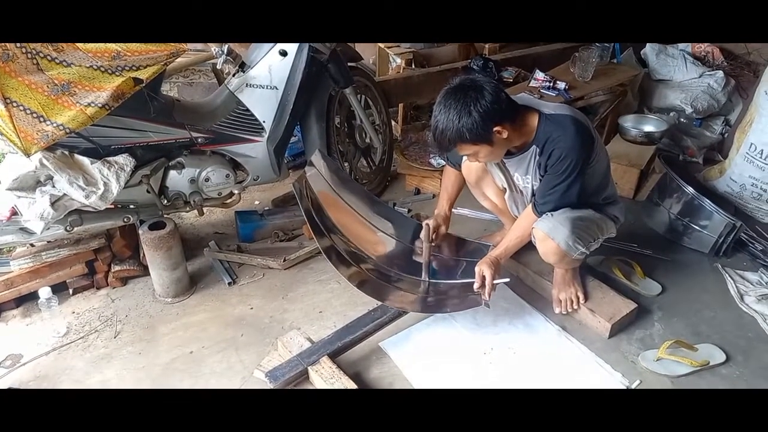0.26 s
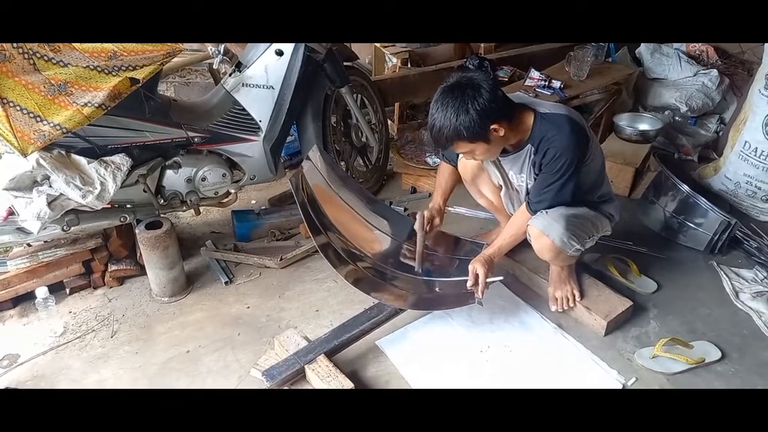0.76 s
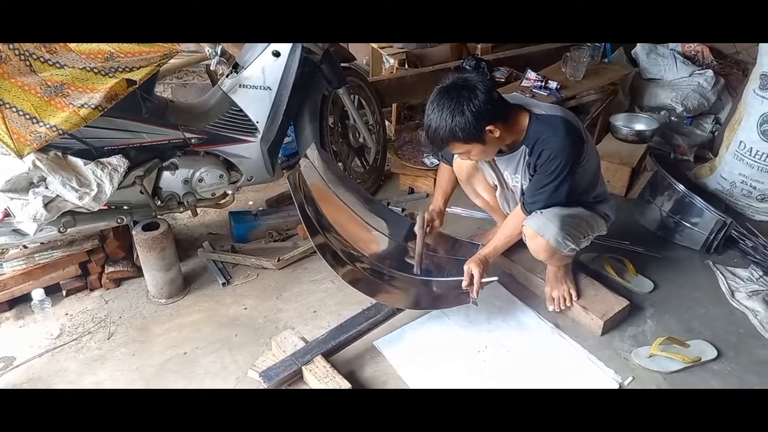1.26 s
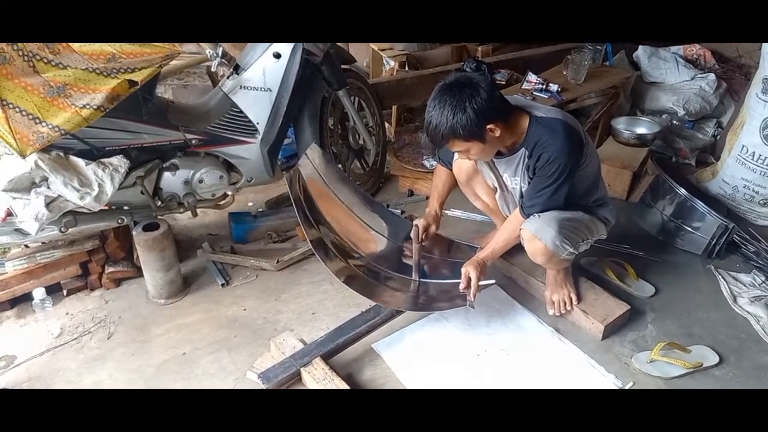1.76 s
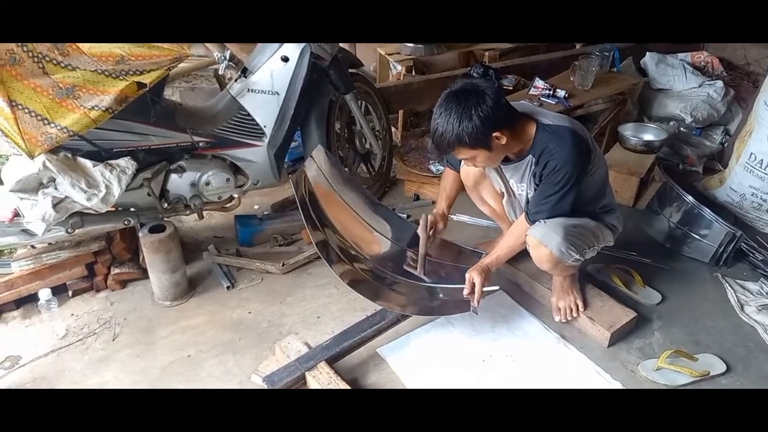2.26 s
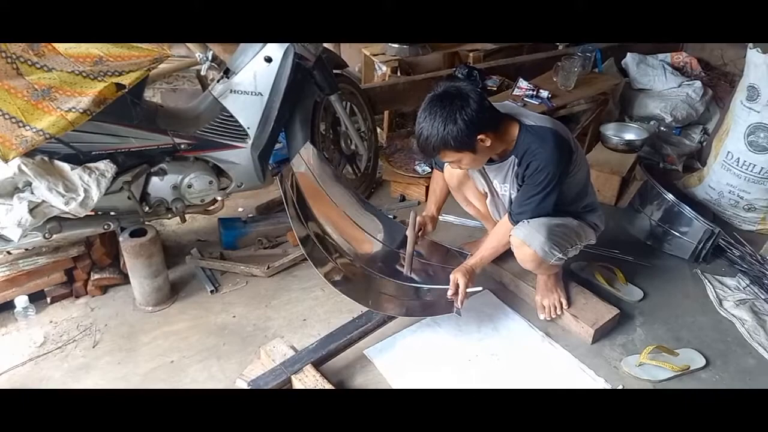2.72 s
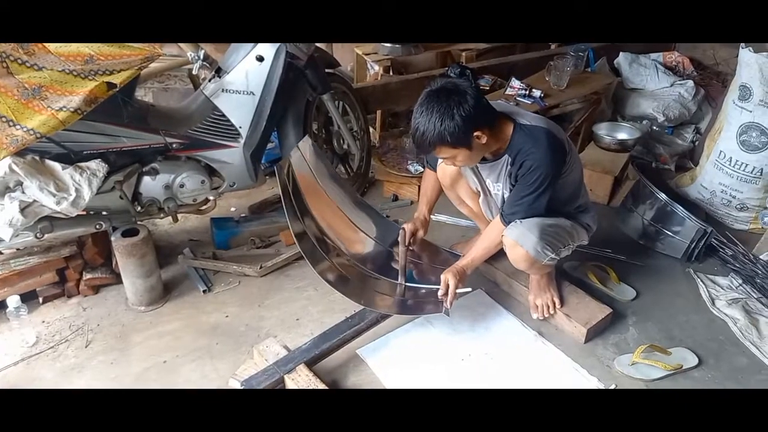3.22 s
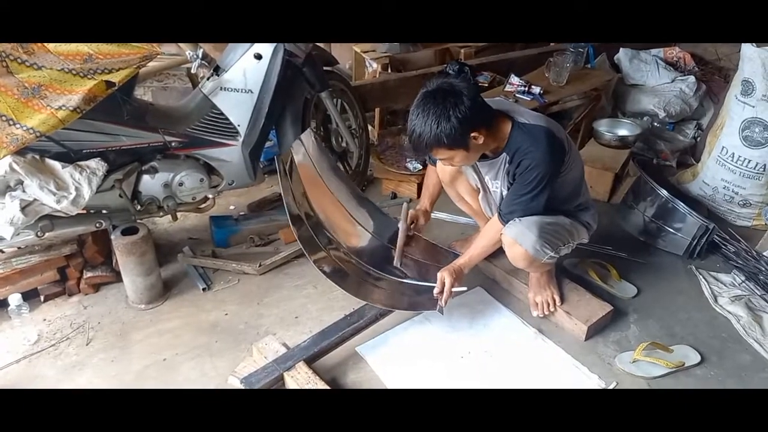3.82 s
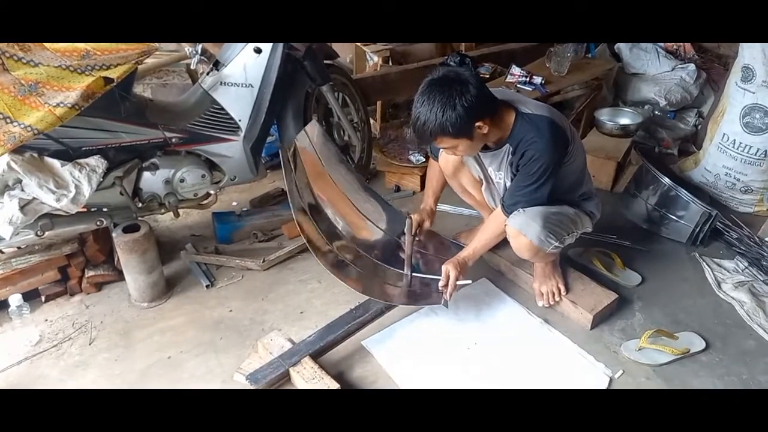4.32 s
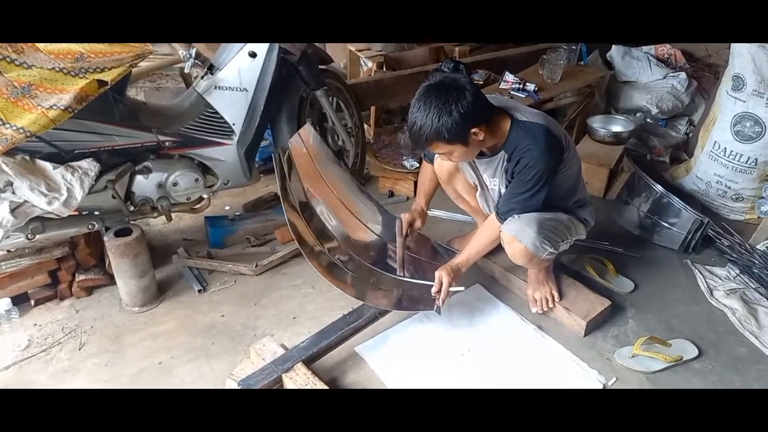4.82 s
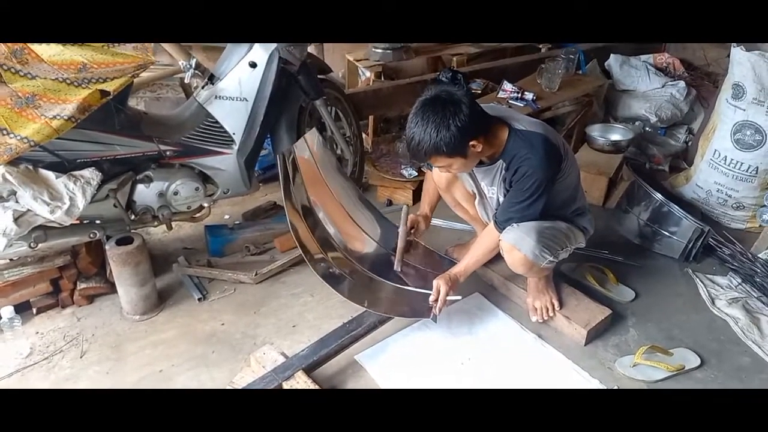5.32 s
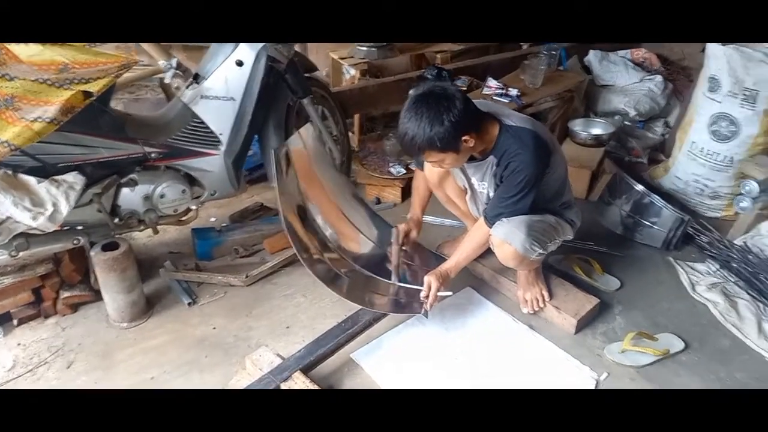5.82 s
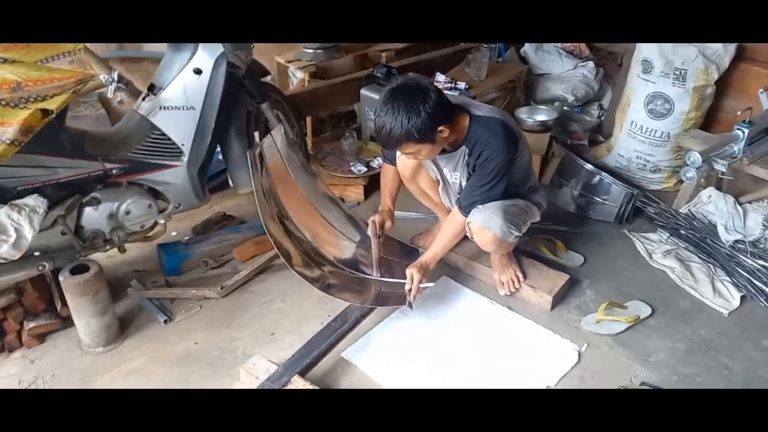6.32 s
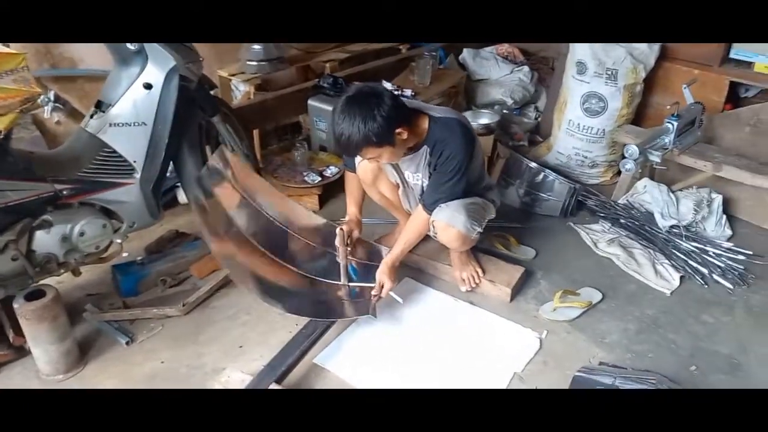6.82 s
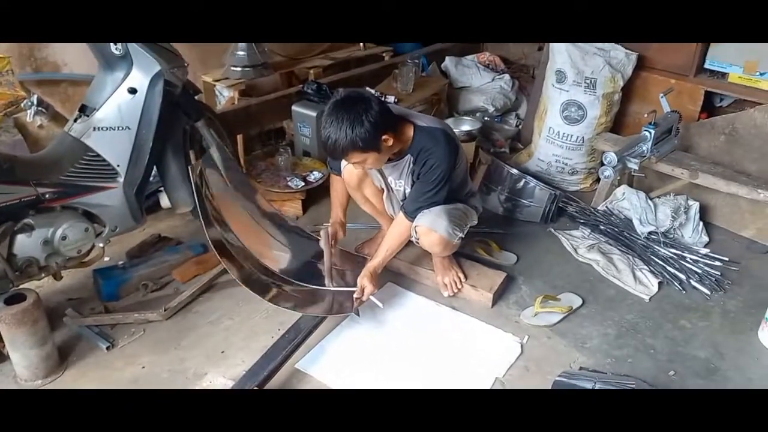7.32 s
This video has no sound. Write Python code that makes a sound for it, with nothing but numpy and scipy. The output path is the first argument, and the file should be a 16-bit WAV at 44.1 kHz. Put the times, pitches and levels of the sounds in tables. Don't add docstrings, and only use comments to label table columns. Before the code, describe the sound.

Steady hammer blows on a chisel ring a curved metal sheet in an open workshop, pausing briefly before one last clanging strike.

```python
import sys
import numpy as np
from scipy import signal
from scipy.io import wavfile
from scipy.ndimage import uniform_filter1d

SR = 44100
rng = np.random.default_rng(int(sys.argv[2]) if len(sys.argv) > 2 else 0)


def amp(db):
    return 10 ** (np.asarray(db, float) / 20)


def write(x):
    x = np.atleast_2d(x).T
    wavfile.write(sys.argv[1], SR, np.round(np.clip(x, -1, 1) * 32767).astype(np.int16))


N = 333837


def evened(x):
    return x / np.sqrt(np.mean(abs(x) ** 2) + 1e-20)


def read(points, hz):
    f, value = np.transpose(points)
    return np.interp(np.log(hz + 1), np.log(f + 1), value)


def add(mix, s, sound):
    at = round(s * SR)
    sound = sound[:, max(-at, 0):]
    part = mix[:, max(at, 0):][:, :sound.shape[1]]
    part += sound[:, :part.shape[1]]


# [f/Hz, share]
LIKENESS = [(30, .9), (70, 0.63), (140, 1), (290, 0.79), (640, 0.66), (1400, 0.1), (3100, 0.32),
            (6800, 0.028), (15000, 0.092)]
# [f/Hz, level/dB]
LEFT_LEAN = [(60, 15), (120, -6.5), (240, 2.5), (480, 1), (950, -1), (1890, -7), (3770, -4.5), (7520, 1.5),
             (15000, -2)]


def pair(hz, left, other, same_share=1):
    same = np.clip(same_share * read(LIKENESS, hz), -1, 1)
    lean = amp(read(LEFT_LEAN, hz) / 2)
    late = np.exp(-2j * np.pi * hz * 2 / SR)
    right = same * left * late + np.sqrt(1 - same ** 2) * other
    return np.array([left * lean, right / lean])


def noise(points, length, same_share, t60=None, patchy_db=0.):
    hop, size = 64, 256
    frames, hz = length // hop + 5, np.fft.rfftfreq(size, 1 / SR)
    a, b, c, d, patches = rng.standard_normal((frames, 129, 5)).T
    patches = uniform_filter1d(patches, size=4, axis=0)
    patches = evened(uniform_filter1d(patches, size=30, axis=1))
    level_db = read(points, hz)[:, None] + patchy_db * patches
    z = pair(hz[:, None], a + 1j * b, c + 1j * d, same_share) * amp(level_db)
    scale = np.sqrt(np.mean(abs(z) ** 2) / size) * 0.65
    if t60:
        z = z * amp(-60 * np.arange(frames) * hop / SR / read(t60, hz)[:, None])
    sound = signal.istft(z, nperseg=size, noverlap=size - hop, scaling="psd")[1]
    return sound[:, :length] / scale / 16


# [f/Hz, level/dB per Hz]
AIR_SPECTRUM = [(20, -48.5), (40, -25.5), (75, -5), (110, -5.5), (370, -17), (1500, -24.5), (3000, -27.5),
                (5000, -34.5), (11000, -38), (15000, -37.5), (15600, -80)]


def shed_air():
    frames, hz = N // 512 + 5, np.fft.rfftfreq(2048, 1 / SR)
    a, b, c, d, patches = rng.standard_normal((frames, 1025, 5)).T
    patches = uniform_filter1d(patches, size=10, axis=0)
    patches = evened(uniform_filter1d(patches, size=12, axis=1))
    level_db = read(AIR_SPECTRUM, hz)[:, None] + 2.6 * patches
    z = pair(hz[:, None], a + 1j * b, c + 1j * d) * amp(level_db)
    return amp(-60) * evened(signal.istft(z, nperseg=2048, noverlap=1536)[1][:, :N])


# [t/s, length/s, f/Hz, wander/Hz, level/dB]
FAR_TONES = [
    (7.21, .15, 4450, 25, -77),
    (7.25, .12, 3480, 45, -75),
    (6.88, .08, 3380, 40, -70),
    (2.75, .13, 4470, 25, -72),
    (1.92, .24, 132, 3, -49),
    (2.6, 1.4, 50, 2, -68),
]


def far_tones():
    out = np.zeros((2, N))
    for start, length, hz, width, db in FAR_TONES:
        t = np.arange(round(length * SR)) / SR
        waver = evened(uniform_filter1d(rng.standard_normal(len(t)), size=900))
        tone = np.sin(2 * np.pi * np.cumsum(hz + width * waver) / SR)
        add(out, start, amp(db) * tone * signal.windows.tukey(len(t), .6) * np.ones((2, 1)))
    return out


# [f/Hz, level/dB per Hz]
SCRAPE_SPECTRUM = [(1200, -25), (2500, 1.5), (3500, -5), (6600, -11), (8600, -8.5), (10000, -15.5),
                   (14800, -12), (15500, -48.5)]
# [t/s, end t/s, level/dB, fall/dB]
CHISEL_SLIDES = [
    (1.171, 1.45, -47.5, 14),
    (1.405, 1.855, -52, 4.5),
    (1.798, 2.217, -54, 7.5),
    (2.155, 2.906, -64.5, -2.5),
    (4.271, 4.394, -50.5, -0.5),
    (4.498, 4.75, -71, 3),
    (5.369, 5.448, -41.5, 25),
]
# [t/s, level/dB]
TIP_TOUCHES = [
    (6.9616, -54),
    (7.0267, -52),
    (7.4048, -50),
    (7.425, -38.5),
]


def chisel():
    out = np.zeros((2, N))
    for start, end, db, fall_db in CHISEL_SLIDES:
        n = round((end - start) * SR)
        shape = amp(db - fall_db * np.linspace(0, 1, n)) * signal.windows.tukey(n, .45)
        add(out, start, shape * noise(SCRAPE_SPECTRUM, n, .4, patchy_db=1.2))
    t = np.arange(4000) / SR
    tick_spectrum = [(700, -32.0), (1800, 3.0), (4500, 12), (16000, -5)]  # (Hz, dB per Hz)
    for s, db in TIP_TOUCHES:
        shape = np.exp(-t / 0.0018) + 0.13 * np.exp(-t / 0.017)
        add(out, s, amp(db) * shape * noise(tick_spectrum, len(t), 0.49))
    return out


# [f/Hz, rise/s]
SWELL = [(100, 0.017), (300, 0.0025), (1000, 0.0016), (4000, .0006)]


def mode_rings(hz, t60, t):
    step = (2j * np.pi * hz - np.log(1000) / t60)[:, None, None]
    blocks = t.reshape(-1, 200)
    slow = np.exp(step * blocks[:, :1]).astype(np.complex64)
    quick = np.exp(step * blocks[:1]).astype(np.complex64)
    rings = (slow * quick).reshape(len(hz), -1)
    rings[:, :3000] *= 1 - np.exp(-t[:3000] / read(SWELL, hz)[:, None])
    return rings


# [f/Hz, level/dB per Hz]
PLATE_SPECTRUM = [(40, -39.5), (65, -22), (88, -10), (160, -8.5), (240, -8), (300, -2), (450, 0),
                  (700, -3.5), (1000, -1), (2000, -0.5), (2750, -5), (3200, -14), (4000, -19.5),
                  (5300, -30.5)]
# [f/Hz, t60/s]
PLATE_DECAY = [(70, 0.21), (200, 0.69), (500, 0.44), (1200, 0.47), (2500, 0.34), (5000, 0.27)]
# [f/Hz, share]
NEAR_BLOW = [(200, 0.073), (600, 0.1), (1200, 1), (2200, 0.31), (4500, 0.36)]


def close_modes(blows, t, count=500):
    offset, damping, near_turn, far_turn, creep_rate, strength = rng.random((6, count))
    hz = 50 + (np.arange(count) + offset) * 10
    rings = mode_rings(hz, read(PLATE_DECAY, hz) * amp(7 * (damping - .5)), t)
    rings *= 1 + read(NEAR_BLOW, hz)[:, None] * np.exp(-t / 0.0054) + amp(-41 + 27 * t)
    s, blow_db = blows.T[:2, :, None]
    a, b, c, d = rng.standard_normal((len(blows), 4, count)).swapaxes(0, 1)
    creep = 0.23 * s * (1 + hz / 1500) * creep_rate
    near = np.exp(1j * (2 * np.pi * near_turn + creep)) + 0.42 * (a + 1j * b)
    far = np.exp(1j * (2 * np.pi * far_turn + creep)) + 0.19 * (c + 1j * d)
    size = evened(amp(read(PLATE_SPECTRUM, hz) + 7 * (strength - .5))) / np.sqrt(count)
    bright_db = (5 - 0.03 * s) * np.exp(-np.log(hz / 2400) ** 2 / 0.12)
    drive = pair(hz, near, far, 0.91) * size * amp(2.5 + bright_db) * amp(blow_db)
    sound = (drive.astype(np.complex64) @ rings).imag.transpose(1, 0, 2)
    bends = 1 + .012 * rng.standard_normal(len(blows))
    return np.array([[np.interp(t * bend, t, side) for side in blow] for blow, bend in zip(sound, bends)])


# [f/Hz, level/dB, t60/s]
STRIP_BOOM = [(94, -24, .3), (150, -24, .45), (246, 1, .24), (228, -11, .5), (251, -10, .85),
              (242, -18, .7)]
# [f/Hz, level/dB, t60/s]
BELLY_MODES = [(353, 1, .22), (391, -2, .24), (450, -2, .18), (312, -9, .4)]
# [f/Hz, level/dB, t60/s]
CLANG_MODES = [(1674, -1.5, .2), (1663, -10, .25), (3650, -53, .7)]
# [f/Hz, level/dB, t60/s]
STEADY_MODES = [(533, -19, .2), (612, -13, .16), (717, -15, .14), (782, -16, .2), (830, -10, .22),
                (950, -15, .13), (1155, -16, .16), (1915, -13, .14), (2490, -15, .16), (3038, -22, .2)]
# [f/Hz, level/dB, t60/s]
RIM_MODES = [(438, -20, .5), (503, -19, .55), (580, -16, .4), (847, -21, .55), (1020, -21, .55),
             (1248, -20, .55), (1301, -13, .45), (1312, -19, .5), (1423, -20, .5), (1678, -19, .5),
             (1790, -17, .35), (1967, -21, .5)]
# [t/s, level/dB]
CLANG_GRIP = [(.5, 6.5), (1.8, -5.5), (3.3, -17), (4.3, -12), (5, 1), (6.4, -0.5), (7.45, -9.5)]


def strong_modes(blows, t):
    hz, mode_db, t60 = np.array(STRIP_BOOM + BELLY_MODES + CLANG_MODES + STEADY_MODES + RIM_MODES).T
    s, blow_db, flex_db, _ = blows.T[:, :, None]
    groups = [(-4 + 0.23 * s, STRIP_BOOM),
              (flex_db + 5.0, BELLY_MODES),
              (np.interp(s, *np.transpose(CLANG_GRIP)), CLANG_MODES),
              (0 * s + 5.2, STEADY_MODES),
              (2.5 - 0.41 * s, RIM_MODES)]
    group_db = np.hstack([np.repeat(db, len(modes), axis=1) for db, modes in groups])
    place_db = 2.5 * rng.standard_normal(group_db.shape)
    phase, apart = rng.random((2, len(hz)))
    turn = np.exp(2j * np.pi * np.array([phase, phase + 0.1 * (2 * apart - 1)]))
    sway = np.exp(.6j * s * rng.standard_normal(len(hz)))
    drive = pair(hz, turn[0], turn[1], 1.027)[:, None] * sway
    drive = drive * amp(group_db + mode_db + place_db) * amp(blow_db)
    return (drive.astype(np.complex64) @ mode_rings(hz, t60, t)).imag.transpose(1, 0, 2)


# [t/s, level/dB, flex/dB, glance/dB]
HAMMER_BLOWS = [(0.295, -18, -3, -23), (0.661, -17, -8, -23.5), (1.028, -17.5, 1, -24.5),
                (1.396, -17, -4, -23), (1.77, -15.5, -7, -21.5), (2.142, -16.5, -5.5, -22.5),
                (2.515, -16.5, -4, -23.5), (2.885, -15.5, -9.5, -26.5), (3.259, -15.5, -6.5, -25),
                (3.637, -16.5, -3, -24), (4.014, -17, -4, -22), (4.383, -18.5, -6, -21),
                (4.763, -15.5, -12, -20.5), (5.139, -17, -9.5, -22.5), (5.516, -15.5, -7.5, -23),
                (5.892, -17, -4.5, -22.5), (6.268, -16, -8, -25.5), (6.63, -15, -19, -26),
                (7.452, -16.5, -7, -19)]
# [t/s, level/dB, flex/dB, glance/dB]
EARLIER_BLOW = [
    (-0.075, -19, -0.58, -24),
]
# [t/s, level/dB, flex/dB, glance/dB]
SHEET_NUDGES = [
    (6.962, -55, -6, -15),
    (7.025, -58, -6, -14),
    (7.099, -64, 4, -27),
]
# [f/Hz, level/dB per Hz]
HISS_SPECTRUM = [(2060, -26.5), (3500, -6.5), (5860, -5.5), (6340, -8.5), (7540, -6.5), (12300, -7.5),
                 (14600, -5.5), (15500, -29.5), (16400, -67)]
# [f/Hz, t60/s]
HISS_DECAY = [(4000, .4), (7000, .31), (11000, .28), (16000, .23)]


def hammering():
    blows, out = np.array(EARLIER_BLOW + HAMMER_BLOWS + SHEET_NUDGES), np.zeros((2, N))
    ring_t = np.arange(30000) / SR
    rings = close_modes(blows, ring_t) + strong_modes(blows, ring_t)
    t = np.arange(16000) / SR
    crack = (1 + 0.43 * np.exp(-t / 0.0014)) * (1 - np.exp(-t / 0.00027))
    for (s, blow_db, _, glance_db), ring in zip(blows, rings):
        add(out, s, ring)
        hiss = noise(HISS_SPECTRUM, len(t), 0.53, HISS_DECAY)
        add(out, s, amp(blow_db + glance_db + 8.5) * crack * hiss)
    return out


def scene():
    return shed_air() + far_tones() + chisel() + hammering()


# [f/Hz, level/dB]
TREBLE_STEPS = [(3000, -6), (4000, 1), (5500, 6), (12000, 6.5), (15000, 7.5), (15400, 30)]


def coarse_treble(x, start=468, size=1024):
    k = np.arange(size) + .5
    basis = np.cos(np.pi / size * np.outer(np.arange(2 * size) + .5 + size / 2, k)) * np.sqrt(2 / size)
    basis *= signal.windows.kaiser_bessel_derived(2 * size, 4 * np.pi)[:, None]
    halves = x[:, start:start + (N - start) // size * size].reshape(2, -1, size)
    frames = np.concatenate([halves[:, :-1], halves[:, 1:]], axis=2)
    bands = (frames @ basis).reshape(2, -1, 64, 16)
    hz = (np.arange(64) + .5) * SR / 128
    level = np.sqrt((bands ** 2).mean(axis=3, keepdims=True)) + 1e-9
    loud_db = 20 * np.log10(level.max(axis=2, keepdims=True))
    luck = evened(uniform_filter1d(rng.standard_normal(level.shape[1:]), size=2, axis=0))
    step = level * amp(read(TREBLE_STEPS, hz)[:, None] + 3.5 * luck + .08 * (loud_db + 30))
    error = np.sign(bands) * np.floor(abs(bands) / step + .4) * step - bands
    pieces = (frames ** 2).reshape(2, -1, 16, 128).sum(axis=(0, 3)) + 1e-9
    calm = (pieces[:, 1:] / pieces[:, :-1]).max(axis=1) < 30
    error = error * (hz > 3000)[:, None] * calm[:, None, None]
    error = error.reshape(2, -1, size) @ basis.T
    out = x.copy()
    length = error.shape[1] * size
    out[:, start:start + length] += error[:, :, :size].reshape(2, -1)
    out[:, start + size:start + size + length] += error[:, :, size:].reshape(2, -1)
    return out


def low_pass(x):
    return signal.sosfilt(signal.butter(12, 16510, fs=SR, output="sos"), x)


def record(dry):
    held = 1.407 * np.tanh(dry / 1.338)
    edge = signal.firwin(255, 16400, window=("kaiser", 9), fs=SR)
    held = signal.oaconvolve(held, edge[None], "same")
    mix = coarse_treble(held)
    return low_pass(mix)


dry = scene()
out = record(dry)
write(out)
```